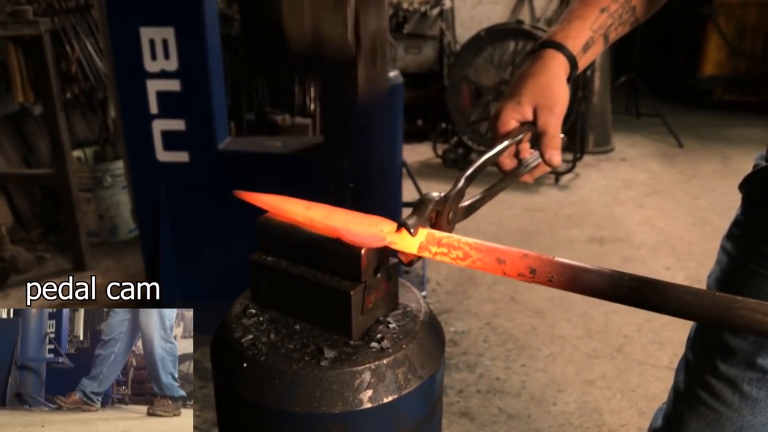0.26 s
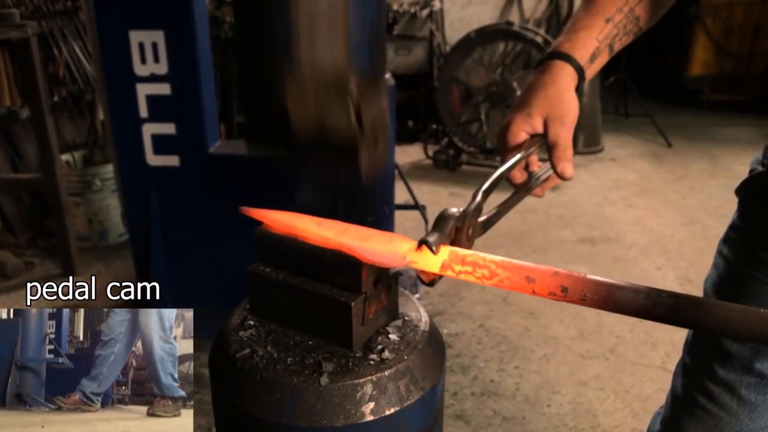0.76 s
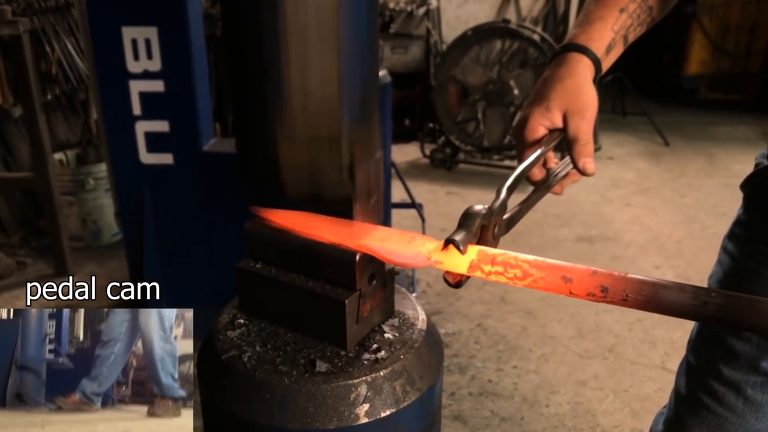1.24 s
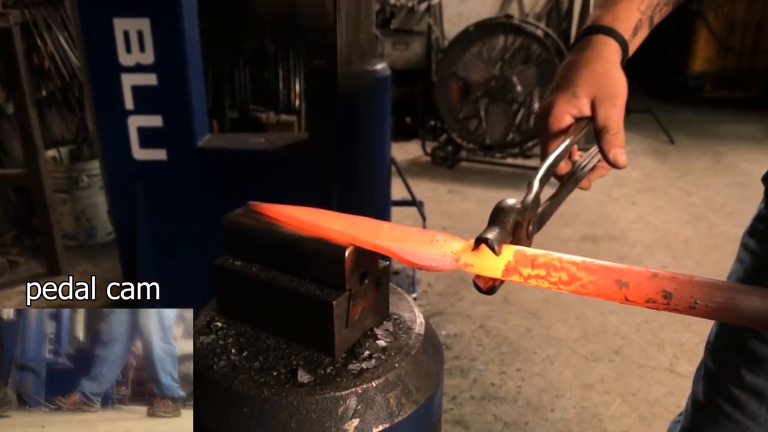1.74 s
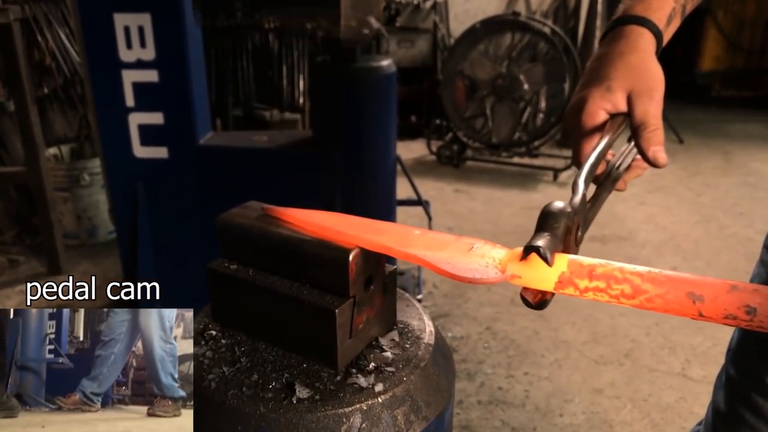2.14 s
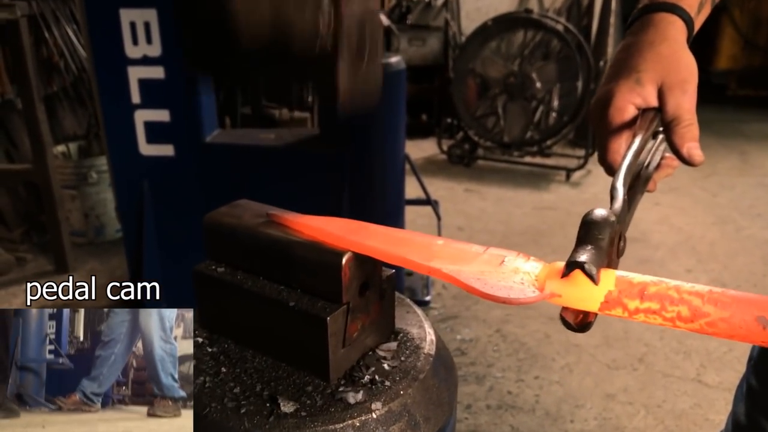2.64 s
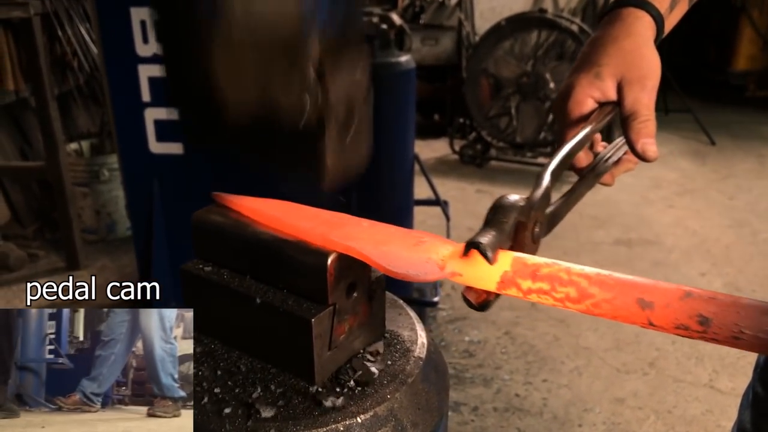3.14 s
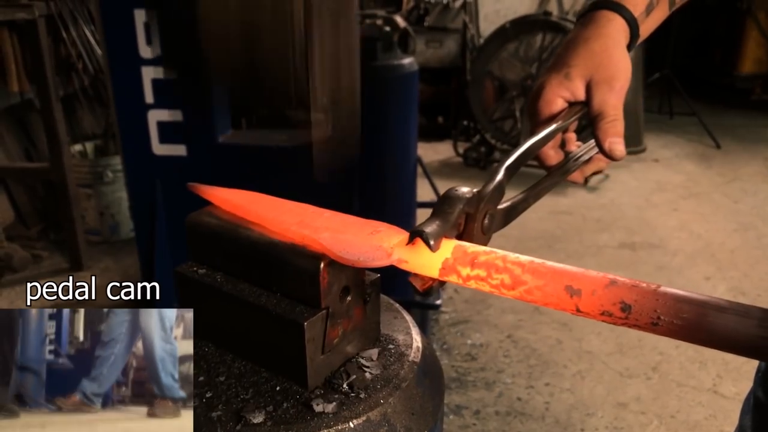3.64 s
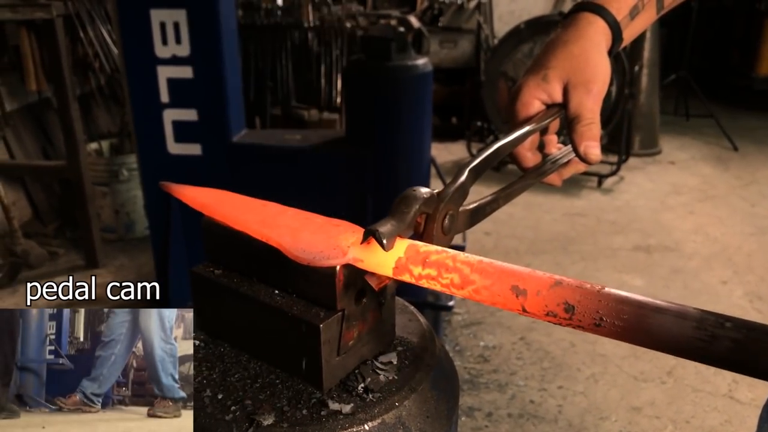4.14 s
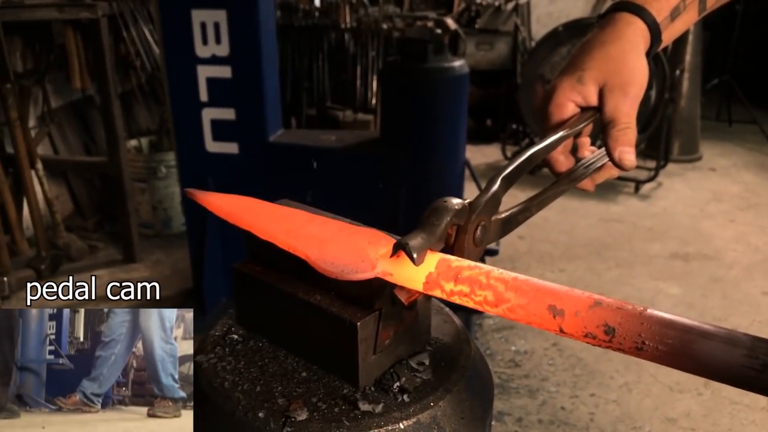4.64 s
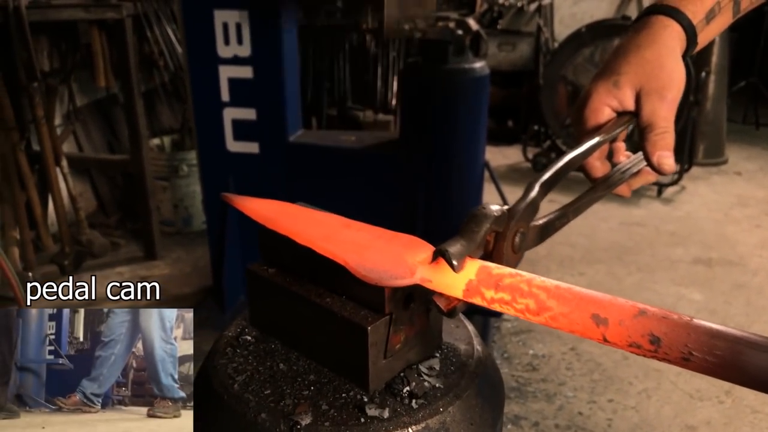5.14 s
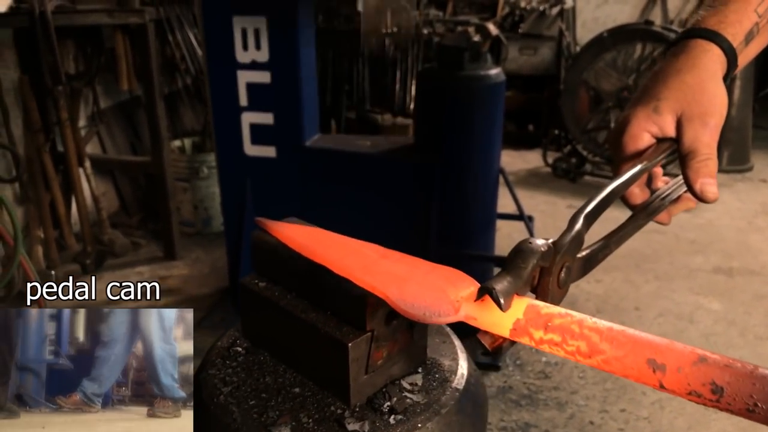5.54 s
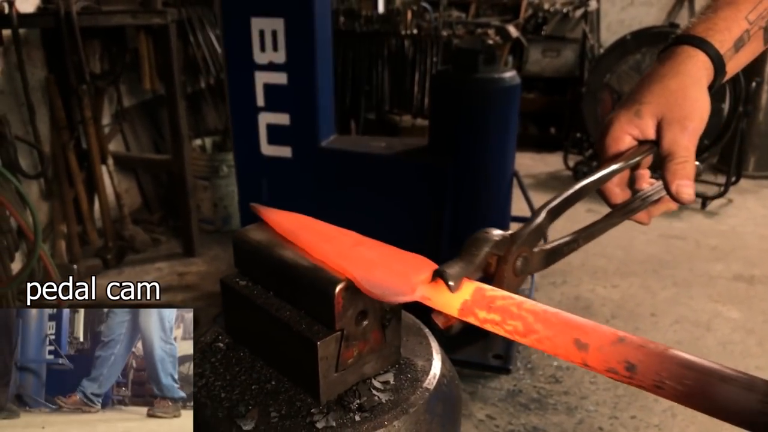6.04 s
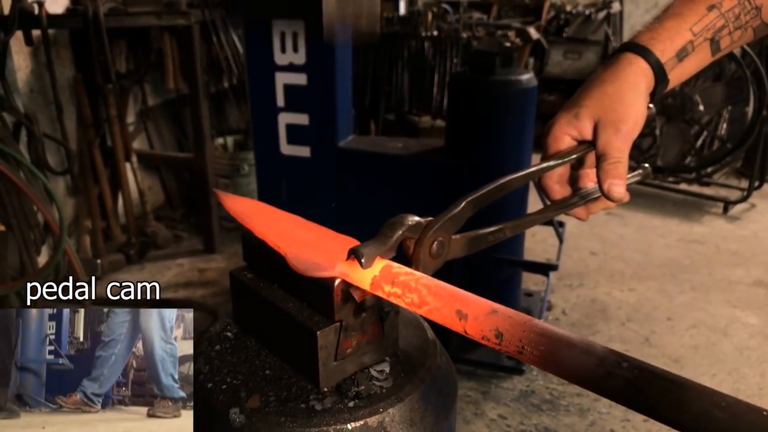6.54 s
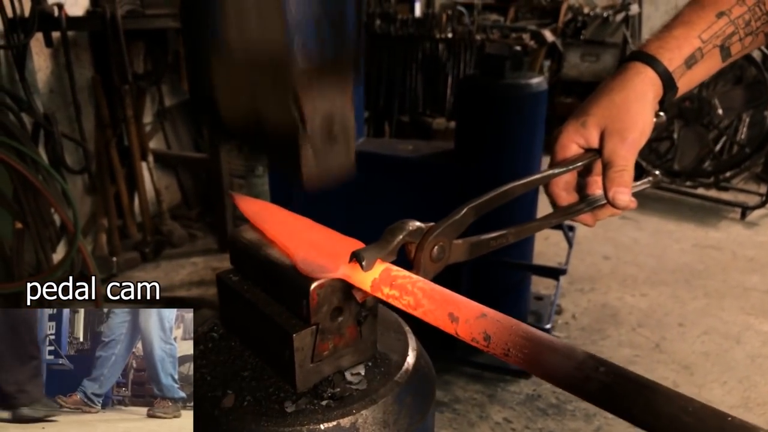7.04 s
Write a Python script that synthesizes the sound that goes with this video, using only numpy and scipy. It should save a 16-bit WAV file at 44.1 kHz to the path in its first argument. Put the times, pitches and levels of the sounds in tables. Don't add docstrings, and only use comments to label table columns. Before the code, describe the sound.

A power hammer strikes hot steel nearly four times a second, close to a small microphone. Before each blow a valve ticks and air hisses; then comes a sharp crack, a heavy thud, a ringing anvil and chattering tongs. Hard workshop walls answer each hit, a motor rumbles below, and the loud peaks sound squeezed and slightly overloaded.

```python
import sys
import numpy as np
from scipy import signal
from scipy.io import wavfile

SR = 44100
rng = np.random.default_rng(int(sys.argv[2]) if len(sys.argv) > 2 else 0)


def volts_from_db(level):
    exponent = np.asarray(level, float) / 20
    return 10 ** exponent


def wrap_up_sound(samples):
    columns = np.atleast_2d(samples).T
    tamed = np.clip(columns, -1, 1)
    steps = np.round(tamed * 32767).astype(np.int16)
    wavfile.write(sys.argv[1], SR, steps)


N = 321472
CYCLE_S = 0.275
TRAVEL_S = 0.0006


def rms_one(x):
    return x / np.sqrt(np.mean(x ** 2) + 1e-20)


def at_hz(points, hz):
    table_hz, value = np.array(points).T
    return np.interp(np.log(hz), np.log(table_hz), value)


def drift(rate):
    r = np.exp(-40 * np.pi * rate / SR)
    noise = rng.standard_normal(N // 20 + 4002)
    slow = rms_one(signal.lfilter([1], [1, -2 * r, r * r], noise)[4000:])
    return np.interp(np.arange(N) / 20, np.arange(len(slow)), slow)


def since(times):
    t = np.arange(N) / SR
    k = np.searchsorted(times, t, side="right") - 1
    age = np.where(k < 0, t - times[0] + CYCLE_S, t - times[k])
    return age, np.maximum(k, 0)


def bands(low_hz, count):
    white = rng.standard_normal((2, N))
    edges = low_hz * 2 ** (np.arange(count + 1) / 3)
    for k in range(count):
        sos = signal.butter(2, edges[k:k + 2], "band", fs=SR, output="sos")
        yield np.sqrt(edges[k] * edges[k + 1]), signal.sosfilt(sos, white[k % 2])


def struck(modes, times, blow_db, scatter_db, lag_s=0):
    at = ((times + TRAVEL_S + lag_s) * SR).astype(int)
    out = np.zeros(N)
    for m, (hz, level_db, t60_s, rise_s) in enumerate(modes):
        w = 2 * np.pi * hz / SR
        clicks = np.full(N, 1e-18)
        force_db = level_db + blow_db + scatter_db * rng.standard_normal(len(at))
        clicks[at] = (-1) ** m * volts_from_db(force_db)
        for sign, decay_s in ((1, t60_s), (-1, rise_s)):
            r = volts_from_db(-60 / (decay_s * SR))
            out += sign * signal.lfilter([0, np.sin(w)], [1, -2 * r * np.cos(w), r * r], clicks)
    return out


# start_s [s], thump_db [dB], anvil_db [dB], bar_db [dB]
BLOWS = [(0.029, -29, -21, -27), (0.3112, -28, -16, -43), (0.5893, -34, -20, -25),
         (0.8609, -28, -17.5, -23), (1.1275, -22, -17.5, -30), (1.3966, -24, -17, -27),
         (1.6654, -28, -18.5, -27), (1.9318, -24, -18.5, -22.5), (2.1978, -33, -18, -22),
         (2.4622, -21, -17, -21), (2.729, -20, -18, -22), (2.9952, -22, -18.5, -26),
         (3.259, -19, -21.5, -25.5), (3.5316, -32, -22.5, -33), (3.8131, -18, -21, -31),
         (4.091, -21, -22.5, -31), (4.3654, -21.5, -22.5, -41), (4.6504, -29, -21, -25),
         (4.9281, -13.5, -17, -17.5), (5.1984, -21, -16.5, -18), (5.467, -21, -18, -20),
         (5.7424, -24, -18.5, -23), (6.0227, -18, -20, -20), (6.293, -33, -20.5, -28),
         (6.57, -30, -23.5, -25), (6.852, -26, -24, -38), (7.136, -29, -23, -30)]


def blows():
    return np.transpose(BLOWS)


# start_s [s], ram_db [dB], tongs_slack_db [dB], valve_snap_db [dB], linkage_play_db [dB]
SMITH = [
    (0.2, -2.5, -7, -18.5, -26),
    (0.86, -0.4, -9, -21.5, -23),
    (1.9, -0.1, -10, -22, -27),
    (2.35, 0.2, 2.5, -26, -29),
    (2.8, 0.7, -9, -24, -36),
    (3.5, -0.5, -1, -25.5, -44),
    (4.4, -1, 3, -22, -29.5),
    (5.2, -2, -7, -26.5, -31),
    (6.3, 0.2, 0, -20, -25),
    (7.14, -2.5, -2.5, -20, -33),
]


def smith(times):
    s, *controls = np.transpose(SMITH)
    return [np.interp(times, s, c) for c in controls]


def exhaust():
    age, _ = since(blows()[0])
    opens_s, rise_s = 0.215, 0.01
    return 1 / (1 + np.exp((opens_s - age) / rise_s))


# pitch_hz [Hz], level_db [dB per Hz]
MOTOR = [(22, -17), (60, -7), (85, -7), (110, 8), (135, -6), (180, 1.5), (240, -5), (295, -19.5),
         (335, -18.5), (450, -37)]


def motor():
    rumble = 0
    for hz, noise in bands(low_hz=21.73, count=13):
        rumble = rumble + noise * volts_from_db(at_hz(MOTOR, hz) + 0.53 * drift(14))
    t = np.arange(N) / SR
    hum = volts_from_db(-57.0) * np.sin(2 * np.pi * 113 * t) + volts_from_db(-53.0) * np.sin(2 * np.pi * 220 * t)
    age, _ = since(blows()[0])
    load = volts_from_db(-7.5) + exhaust() + 2.42 * np.exp(-(age / 0.16) ** 3)
    return (volts_from_db(-36.5) * rms_one(rumble) + hum) * load


# pitch_hz [Hz], level_db [dB per Hz]
AIR = [(250, -40), (400, -12), (650, -9), (800, -12), (1300, -5), (2000, -8.5), (3200, -14), (6000, -11.5),
       (9000, -17), (13500, -17), (16000, -13)]


def air_hiss(hz, opening):
    return volts_from_db(2 * (-20.5 + at_hz(AIR, hz))) * (volts_from_db(-17.5) + opening)


# start_s [s], bright_db [dB], low_db [dB]
KNOCKS = [
    (0.156, -33, -22),
    (1.2474, -28, -18),
    (4.518, -35, -31),
    (4.7755, -36, -22),
    (5.0543, -32, -23),
    (5.869, -29, -25),
    (6.4234, -40, -37),
    (7.2404, -31, -23),
]


def ticks():
    s = blows()[0][1:]
    valve_s = s - 0.0447 - 0.00045 * s
    _, _, snap_db, play_db = smith(valve_s)
    valve = np.transpose([valve_s, snap_db, play_db])
    rows = np.vstack([valve, np.array(KNOCKS) - [0, 0, 4.0]])
    return rows[np.argsort(rows[:, 0])].T


# pitch_hz [Hz], level_db [dB per Hz]
TICK = [(500, -33), (1800, -7), (3500, -11), (6000, 0.5), (9000, -1.5), (15000, -17)]


def valve_tick(hz, age, k, bright_db, low_db):
    snap_t60_s, tail_t60_s = 0.016, 0.066
    decay = volts_from_db(-120 * age / snap_t60_s) + volts_from_db(-16 - 120 * age / tail_t60_s)
    level_db = low_db + 11 if hz < 3500 else bright_db
    return volts_from_db(2 * (6 + at_hz(TICK, hz) + level_db))[k] * decay


# pitch_hz [Hz], level_db [dB], t60_s [s], rise_s [s]
PLATE = [(1420, 3, .03, .003), (1900, 1, .02, .003), (4170, -8, .02, .002), (5410, -7, .025, .002)]


def plate():
    s, _, low_db = np.transpose(KNOCKS)
    return struck(PLATE, s, low_db, 1, -TRAVEL_S)


# pitch_hz [Hz], level_db [dB per Hz]
ECHO = [(200, -16.5), (380, -20), (780, -20.5), (1100, -14), (1800, -18), (2800, -20), (4200, -23.5),
        (6000, -27), (9000, -31.5), (13100, -37.5), (16000, -35)]
# pitch_hz [Hz], t60_s [s]
SHOP_T60 = [(100, 0.46), (500, 0.45), (2000, 0.41), (6000, 0.5), (14000, 0.59)]


def shop_echo(hz, age, lumps):
    decay = volts_from_db(-120 * age / at_hz(SHOP_T60, hz)) * (1 - np.exp(-age / 0.031))
    return volts_from_db(2 * (13 + at_hz(ECHO, hz))) * decay * volts_from_db(1.75 * lumps + 3.1 * drift(30))


TONGS_HZ = [1302, 1598, 1642, 1696, 2102, 2133, 2480, 2972, 3127, 3895, 4420, 4980, 6008, 7434]
# level_db [dB], t60_s [s]
TONGS = [(-43, 2.2), (-35.5, 1.9), (-46, 4.6), (-41, 1.2), (-31.5, 0.76), (-29.5, 0.45), (-39, 0.88),
         (-53, 1), (-34.5, 1.5), (-38, 0.74), (-45, 2), (-43, 1.5), (-37, 0.65), (-32, 0.36)]


def tongs():
    s = blows()[0] + TRAVEL_S
    age, k = since(s)
    slack_db = smith(s)[1]
    out = np.zeros(N)
    for hz, (level_db, t60_s) in zip(TONGS_HZ, TONGS):
        blow_db = level_db + slack_db + 2.5 * rng.standard_normal(len(s))
        out += volts_from_db(blow_db[k] - 60 * age / t60_s) * np.sin(2 * np.pi * hz * age)
    return out * (1 - volts_from_db(-60 * age / 0.02))


# pitch_hz [Hz], level_db [dB per Hz]
CHATTER = [(200, -37), (400, -11.5), (800, -9), (1300, -13), (2200, -12), (3300, -19), (4200, -13.5),
           (6000, -21.5), (9000, -22.5), (13400, -30.5), (16000, -12)]


def die_chatter(hz, age, rattle):
    contact = np.exp(-(age / 0.035) ** 3.3)
    return volts_from_db(2 * (12.5 + at_hz(CHATTER, hz))) * contact * volts_from_db(2.2 * rattle)


# pitch_hz [Hz], level_db [dB per Hz]
CRACK = [(300, -22), (1000, -54), (3000, -12), (8000, -14), (15000, -12.5)]


def die_crack(hz, age):
    t60_s = 0.047
    return volts_from_db(2 * (5.0 + at_hz(CRACK, hz))) * volts_from_db(-120 * age / t60_s) * (hz > 300)


# pitch_hz [Hz], share [0-1]
REPEAT = [(300, .95), (600, .75), (2000, .45), (5000, .25), (10000, .1)]


def clatter():
    s = blows()[0]
    force_db = smith(s)[0]
    tick_s, bright_db, low_db = ticks()
    age, k = since(s + TRAVEL_S)
    tick_age, j = since(tick_s + TRAVEL_S)
    rattle, lumps, opening = drift(120), drift(24), exhaust()
    out = 0
    for hz, noise in bands(low_hz=196.9, count=19):
        colour_db = 0.8 * rng.standard_normal(len(s))
        force = volts_from_db(2 * (force_db + colour_db))[k]
        power = force * (die_crack(hz, age) + die_chatter(hz, age, rattle) + shop_echo(hz, age, lumps))
        alike = at_hz(REPEAT, hz)
        repeated = noise[::-1][(age * SR).astype(int)]
        answer = alike * repeated + np.sqrt(1 - alike ** 2) * noise
        puff = valve_tick(hz, tick_age, j, bright_db, low_db) + air_hiss(hz, opening)
        flutter = volts_from_db(2.7 * drift(16.5))
        out = out + answer * np.sqrt(power) + np.roll(noise, N // 3) * np.sqrt(puff) * flutter
    return out


def air_thump():
    s, thump_db, _, _ = blows()
    age, k = since(s)
    late = age - 0.0209
    heave = np.exp(-(late / 0.015) ** 2) * np.sin(2 * np.pi * 48.6 * late)
    return volts_from_db(9 + thump_db)[k] * heave * (1 - np.exp(-(age / 0.008) ** 2))


# pitch_hz [Hz], level_db [dB], t60_s [s], rise_s
# [s]
BASE_AND_FRAME = [(115, -1.5, .15, .05), (237, -8, .15, .02),
                  (72.5, -19.5, 0.3, 0.099), (169, -9.5, 0.24, 0.057), (169, -20.5, 0.45, 0.3),
         (287.4, -10.5, 0.15, 0.021), (332.2, -8.5, 0.13, 0.029), (381, -30.5, 0.12, 0.025),
         (451.8, -17.5, 0.21, 0.064), (524, -11.5, 0.16, 0.03), (576, -27.5, 0.43, 0.15)]


def frame():
    return struck(BASE_AND_FRAME, blows()[0], 0, 0.7, lag_s=0.003)


# pitch_hz [Hz], level_db [dB], t60_s [s], rise_s [s]
ANVIL = [(660.7, 15, 0.21, 0.048), (982.2, 9, 0.31, 0.03)]
# pitch_hz [Hz], level_db [dB], t60_s [s], rise_s [s]
BAR = [(1345, 5.5, .4, .04)]


def anvil_and_bar():
    s, _, anvil_db, bar_db = blows()
    return struck(ANVIL, s, anvil_db, 0.7) + struck(BAR, s, bar_db, 0)


# pitch_hz [Hz], level_db [dB], t60_s [s], rise_s [s]
RAM = [(1100, -20, .1, .02), (1480, -17, .1, .02), (1970, -18, .1, .01), (2360, -19, .07, .01),
       (3070, -27, .1, .01), (3534, -32, .3, .02), (4100, -26, .07, .01), (4300, -27, .07, .01)]


def ram():
    return struck(RAM, blows()[0], 0, 3)


def scene():
    background = motor() + plate() + tongs()
    hammer = clatter() + air_thump() + frame() + anvil_and_bar() + ram()
    return (background + hammer)[None]


# pitch_hz [Hz], width_hz [Hz], dip_db [dB]
NARROW_DIPS = [(4836, 460, -7.5), (7690, 560, -4.5), (10390, 460, -8), (15300, 580, -4)]


def housing(x):
    for hz, width_hz, dip_db in NARROW_DIPS:
        b, a = signal.iirpeak(hz, hz / width_hz, fs=SR)
        x = x - (1 - volts_from_db(dip_db)) * signal.lfilter(b, a, x)
    return x


def limiter(x):
    ramp_db = 160 * np.arange(N) / SR
    over_db = np.maximum(20 * np.log10(abs(x) + 1e-9), 0)
    held_db = np.maximum.accumulate(over_db + ramp_db) - ramp_db
    gain_db = -signal.lfilter([0.08], [1, -0.92], held_db)
    return np.clip(x * volts_from_db(gain_db), -0.88, 0.88)


def roll_off(x):
    return signal.sosfilt(signal.butter(12, 16800, fs=SR, output="sos"), x)


def record(dry):
    x = limiter(housing(dry[0]))
    top_cut = signal.cheby2(18, 60, 16050, fs=SR, output="sos")
    x = signal.sosfilt(top_cut, x)
    return roll_off(x[None])


dry = scene()
out = record(dry)
wrap_up_sound(out)
```